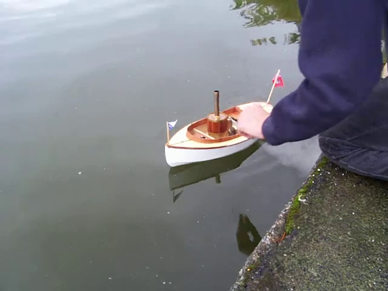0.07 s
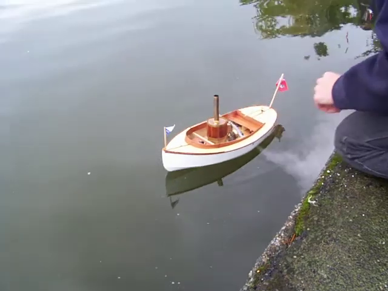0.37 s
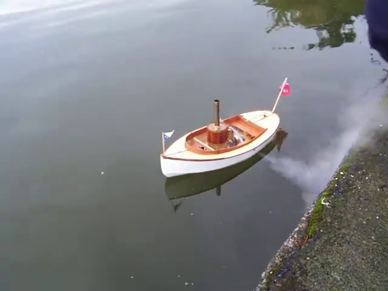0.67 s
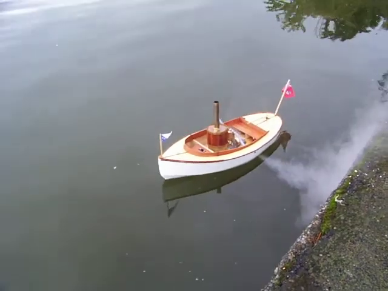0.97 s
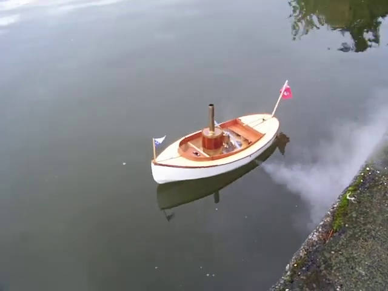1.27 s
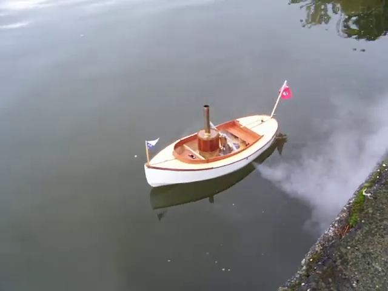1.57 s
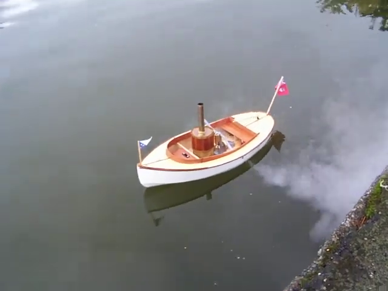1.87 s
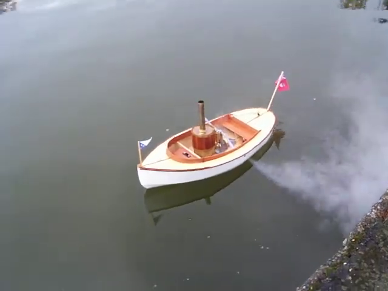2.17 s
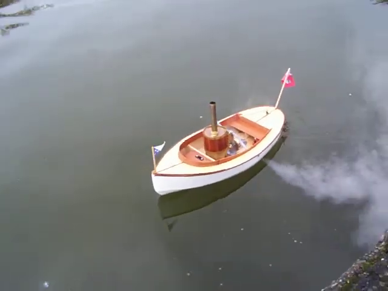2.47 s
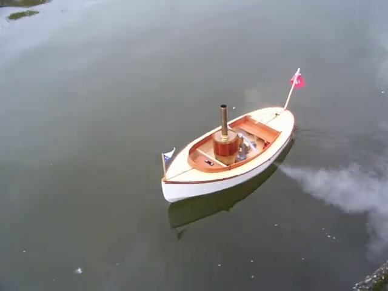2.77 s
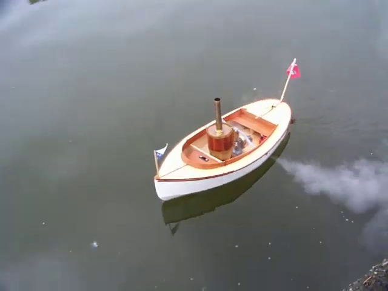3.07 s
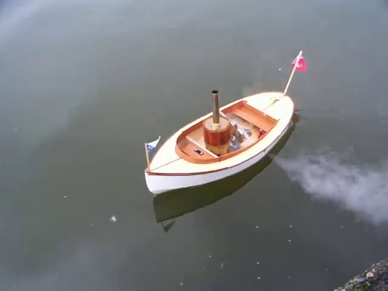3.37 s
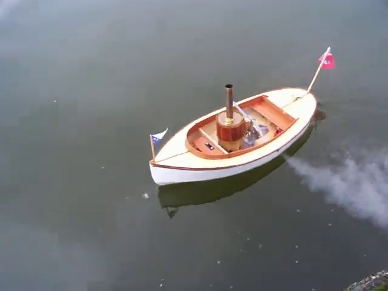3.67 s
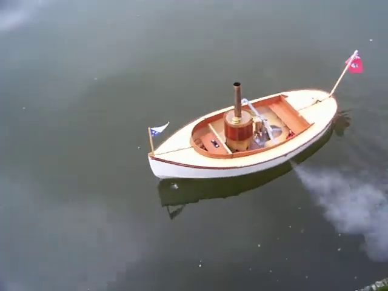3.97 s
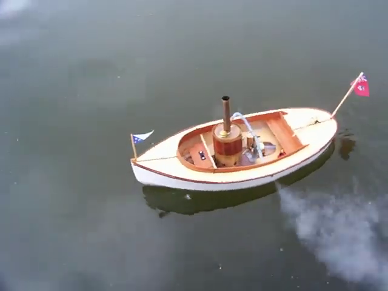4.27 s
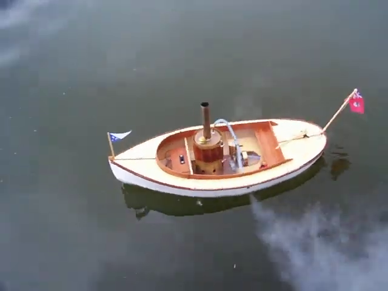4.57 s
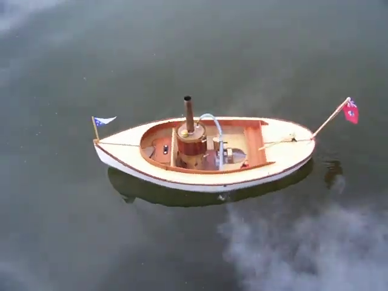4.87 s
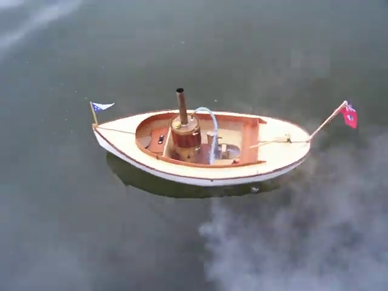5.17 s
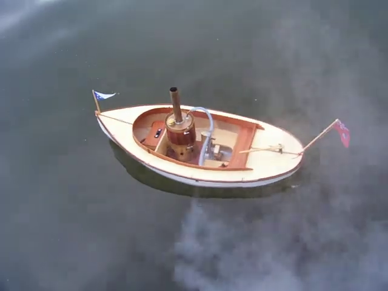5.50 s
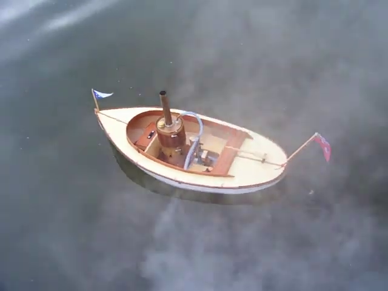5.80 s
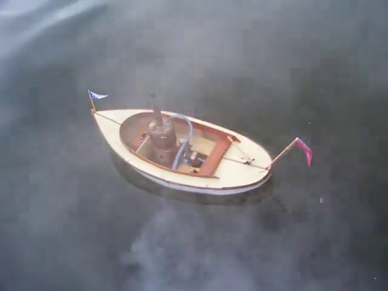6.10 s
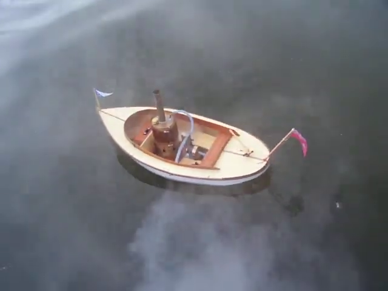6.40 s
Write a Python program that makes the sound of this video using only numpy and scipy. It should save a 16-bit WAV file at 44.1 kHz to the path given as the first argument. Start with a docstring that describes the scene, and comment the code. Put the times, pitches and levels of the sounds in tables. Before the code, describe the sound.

From about 0.2 seconds a small model steam launch is heard close by on a pond, its engine puffing about thirty-five times a second. Each puff is sharp and wet, with a high hiss, a faint gurgle and a knock that rings the hollow wooden hull; thinner leaking steam sputters between the puffs. From 0.5 to 1.5 seconds several soft, hollow bumps sound from the deck, with one more at 5 seconds. Tiny shrill spits of water come irregularly, thickest around 1.5 and from 3.5 to 4 seconds. After 2 seconds the engine gradually slows and the knocking softens as the boat draws away. Around 5 seconds the hiss swells, and a hollow note in the exhaust slides downward until the end at 6.5 seconds. There is one brief click near 5.4 seconds. Light wind rumbles on the microphone throughout.

```python
"""At the stone bank of a pond, close to a small camera's microphone, a model steam launch pulls away.
Its one-cylinder engine turns about 30 times a second. Each turn gives a sharp, wet exhaust puff, a knock
that rings the wooden hull and the cockpit, and a softer hiss of steam leaking at the port. Slugs of
water chirp in the pipe, and the jet changes colour as the boat swings from stern-on towards broadside.
Light wind rumbles on the microphone."""
import sys
import numpy as np
from scipy import signal
from scipy.fft import rfft, irfft
from scipy.io import wavfile
from scipy.ndimage import uniform_filter1d

SR = 44100
rng = np.random.default_rng(int(sys.argv[2]) if len(sys.argv) > 2 else 0)


def generate_wav(signal):
    """Clip the signal to [-1, 1] and save it as 16-bit WAV at the path in sys.argv[1]."""
    frames = np.transpose(np.atleast_2d(signal))
    scaled = np.clip(frames, -1, 1) * 32767
    pcm = np.round(scaled).astype(np.int16)
    wavfile.write(sys.argv[1], SR, pcm)


N = 288414
TIME = np.arange(N) / SR


# The engine, slowing on its way out. Each row: time in seconds, turns a second.
ENGINE_SPEED = [(0.23, 33.18), (0.53, 35.08), (0.73, 34.28), (1.15, 35.74), (1.43, 35.25), (2.05, 34.8),
                (2.32, 34.01), (2.45, 32.49), (2.76, 32.64), (3.42, 30.51), (3.78, 30.83), (3.91, 29.93),
                (4.04, 30.45), (4.17, 29.78), (4.82, 29.3), (4.95, 29.57), (5.63, 29.42), (6.54, 27.91)]
# The sound skips twice, as if a moment dropped out.
# Each row: time in seconds, jump of the rhythm as part of a turn.
SKIPS = [(2.934, .53), (5.4235, .42)]

def crank():
    """Turns of the crankshaft as heard: slightly uneven in speed, and jumping where the sound skips."""
    first_turn = .49
    jumps = sum(part * (TIME > s) for s, part in SKIPS)
    wobble = .002 * np.interp(TIME, np.linspace(0, TIME[-1], 100), rng.standard_normal(100))
    return first_turn + np.cumsum(curve(ENGINE_SPEED)) / SR - jumps + wobble


# Strokes that stand out. Each row: time in seconds, level in dB against their neighbours.
ODD_STROKES = [(.26, -4), (.33, -0.5), (.9, 1), (.98, -1.5), (1.32, 2.5), (1.435, 2), (1.52, -2.5),
               (2.06, -4), (2.12, -3), (2.21, 3), (2.24, -3.5), (2.27, 1.5), (2.33, -4.5), (2.42, 3),
               (2.505, -2.5), (2.63, 2), (2.75, 2), (2.88, 1), (3.63, 0), (3.83, 7.5), (4.36, -1),
               (4.49, -7), (5.73, 3), (5.765, -2), (5.9, 5.5), (6.18, 0), (6.46, 2)]

def accents(turns):
    """Gain of the hard and the starved strokes, held for their turn."""
    stroke = np.floor(turns)
    return gain_of(sum(db * (stroke == np.round(np.interp(s, TIME, turns))) for s, db in ODD_STROKES))


# Steam at the pipe and at the port. Each row: part of a turn since the exhaust opened, relative flow in dB.
PUFF_FLOW = [(0, -11), (.045, -4.5), (.09, -1), (.17, -7), (.25, -13), (.36, -24), (.6, -45), (1, -32)]
LEAK_FLOW = [(0, -10.5), (.2, -15.5), (.38, -16.5), (.45, -12), (.51, 2.5), (.6, 5), (.74, 1.5), (.85, -5),
             (1, -5.5)]

def steam(turns):
    """Flow of the exhaust puffs, some clipped and some drawn out, and of the leak between them."""
    angle = turns % 1
    puff_db = np.interp(angle * per_turn(turns, spread_db=.9), *np.transpose(PUFF_FLOW))
    puff = gain_of(puff_db) * accents(turns) * per_turn(turns, spread_db=.96)
    leak = gain_of(np.interp(angle, *np.transpose(LEAK_FLOW))) * per_turn(turns, spread_db=1.17)
    return puff, leak


# The exhaust jet at the microphone. Each row: time in seconds, hiss in dB, roar in dB.
JET_LEVEL = [(.23, -31.5, -34.5), (1.05, -31, -36.5), (1.45, -30, -34), (1.8, -28, -34.5),
             (1.93, -29.5, -36.5), (3.26, -33.5, -36.5), (3.39, -32, -40), (3.55, -30.5, -37.5),
             (3.91, -35.5, -43), (4.04, -30, -35.5), (4.17, -34, -45), (4.3, -33, -36.5),
             (4.66, -33.5, -41.5), (4.88, -28.5, -37), (5.25, -27, -37.5), (5.73, -33, -38),
             (6.54, -33.5, -36.5)]
# The hiss from astern and from broadside. Each row: frequency in Hz, relative level in dB.
HISS_ASTERN = [(2530, -65.5), (4300, -48), (4900, -14.5), (5590, -1), (6450, -4), (7140, 4), (7480, 7.5),
               (8150, 3), (8490, -9), (9000, -30.5), (11700, -60.5), (19800, -120)]
HISS_BROADSIDE = [(2530, -47), (4300, -21), (4630, -14), (5700, -21.5), (6190, -3.5), (6630, -1.5),
                  (7230, 4), (7930, -3.5), (8590, -14), (9000, -29), (11700, -24.5), (19800, -120)]

def hiss(puff):
    """Fine turbulence at the exhaust pipe, wet with condensate."""
    jet = puff * condensate(per_s=400, size=.8, rise_s=.00045) * rng.standard_normal(N)
    return gain_of(curve(JET_LEVEL)) * turning(jet, HISS_ASTERN, HISS_BROADSIDE)


# The roar from astern and from broadside. Each row: frequency in Hz, relative level in dB.
ROAR_ASTERN = [(200, -18.5), (740, -4.5), (1100, 3), (1220, -15), (1350, -1), (1570, -0.5), (1820, -4.5),
               (1980, -14.5), (2260, -3), (2750, -13), (3080, -1.5), (3550, -14.5), (3900, -12.5),
               (5000, -18)]
ROAR_BROADSIDE = [(200, -10), (700, -12), (1100, -8.5), (1250, -16), (1450, -8), (2200, -7), (2450, -6),
                  (2650, -1.5), (3150, -10), (3700, -10.5), (5000, -17.5)]
# The open boat's note, heard side-on. Each row: time in seconds, pitch in Hz, dB against the roar.
HOLLOW_NOTE = [(4.5, 2210, -28), (5.1, 2070, -9), (5.4, 1850, -0.5), (5.8, 1760, -1), (6.15, 1630, -1.5),
               (6.5, 1550, -4)]

def roar(puff, knocks):
    """Coarse eddies linger over the burner's rush and the engine's rattle; puffs pop a hollow note."""
    burner = gain_of(-18)
    eddies = lingering(puff ** 2 + burner ** 2, linger_s=.0035)
    flow = evened(uniform_filter1d(eddies, size=250))
    rattle_share = .3 * (1 - curve(STEAM_SHARE))
    rush = np.sqrt(1 - rattle_share) * flow * rng.standard_normal(N)
    jet = turning(rush + np.sqrt(rattle_share) * rattle(knocks), ROAR_ASTERN, ROAR_BROADSIDE)
    pop = evened(puff * rng.standard_normal(N)) + .99 * knocks
    note = evened(ring(pop, curve(HOLLOW_NOTE), width_hz=400))
    note_gain = gain_of(curve(HOLLOW_NOTE, column=2))
    blend = (jet + note_gain * note) / np.sqrt(1 + note_gain ** 2)
    return gain_of(curve(JET_LEVEL, column=2) - .05) * blend


# Water shot from the exhaust. Each row: time in seconds, relative peak level in dB.
SPITS = [(0.609, -19), (0.639, -20), (.8992, -6), (1.348, -7), (1.378, -8), (1.4641, -7), (1.548, -7.5),
         (1.605, -5), (1.7459, -8.5), (2.09, -11), (2.1216, -3), (2.951, -9), (3.269, -7), (3.5313, -3),
         (3.565, -4), (3.597, -6), (3.63, -5.5), (3.6934, -3.5), (3.7948, -9), (3.726, -8.5), (3.858, -10),
         (3.99, -8), (4.056, -9.5), (4.934, -5), (5.103, -5), (5.1702, -12), (5.3417, -11.5),
         (5.4097, -4.5), (5.4548, -6), (5.5945, -5), (5.6595, -7), (6.356, -9), (6.4625, -20)]

def spits(decay_s=.0007, level_db=-4, glide=.02):
    """Each slug of water leaves the pipe with a shrill chirp of a few cycles."""
    out, t = np.zeros(N), np.arange(-200, 200) / SR
    for s, db in SPITS:
        hz = 7820 - 750 * np.interp(s, *np.transpose(HEADING))  # lower as the pipe turns
        bend, phase = rng.uniform(-1, 1, 2)
        cycles = hz * t * (1 + glide * bend * t / decay_s) + phase
        envelope = gain_of(db + level_db) * np.exp(-abs(t / decay_s))
        at = round(s * SR) - len(t) // 2
        out[at:at + len(t)] += envelope * np.sin(2 * np.pi * cycles)
    return out


# The leak at the microphone. Each row: time in seconds, level in dB.
LEAK_LEVEL = [(.3, -38), (.5, -33.5), (.75, -34), (1.05, -33.5), (1.35, -32.5), (1.62, -32.5), (1.9, -36),
              (2.15, -34), (2.7, -36.5), (3.4, -39), (3.55, -36), (3.75, -40.5), (4.1, -38.5), (4.7, -39),
              (4.9, -32.5), (5.3, -35.5), (5.95, -36), (6.2, -37.5), (6.5, -35.5)]
# Its hiss, thinner and higher than the puff. Each row: frequency in Hz, relative level in dB.
LEAK_COLOUR = [(500, -29.5), (1000, -11.5), (1600, -12), (2100, -15), (2900, -12), (4300, -27), (5500, -16),
               (6400, -10), (7000, -3), (7600, 1), (8200, -7.5), (9000, -32)]

def port_leak(leak):
    """Steam sputters out of the port between the puffs."""
    jet = leak * condensate(per_s=250, size=1.5, rise_s=.0006) * rng.standard_normal(N)
    return gain_of(curve(LEAK_LEVEL)) * coloured(jet, LEAK_COLOUR)


def condensate(per_s, size, rise_s):
    """Drops tear in the jet: a gain that adds brief surges to the flow."""
    drops = (rng.random(N) < per_s / SR) * rng.random(N)
    age = TIME[:512] / rise_s
    return 1 + size * signal.oaconvolve(drops, age * np.exp(1 - age))[:N]


def gurgle(turns, puff):
    """Each puff bubbles through water in the pipe and rings at a pitch of its own."""
    hz = 1480 * per_turn(turns, spread_db=1.5)
    bubbling = lingering(puff ** 2, linger_s=.0028) * rng.standard_normal(N)
    return gain_of(curve(JET_LEVEL, column=2) - 9) * evened(ring(bubbling, hz, width_hz=440))


# The boat seen from the bank. Each row: time in seconds, heading from 0 (stern-on) to 1 (broadside).
HEADING = [(.2, 0.024), (3.2, 0.26), (4.3, 0.65), (5.1, 0.93), (5.6, 0.78), (6.5, 0.65)]

def turning(x, astern, broadside):
    """The colour of the jet follows the heading of the boat."""
    side = curve(HEADING)
    return evened((1 - side) * coloured(x, astern) + side * coloured(x, broadside))


def piston(turns, lag_turns):
    """One blow of the piston in every turn."""
    blows = np.diff(np.floor(turns - lag_turns), prepend=0).clip(0, 1)
    return evened(blows * accents(turns) * per_turn(turns, spread_db=1.16))


def rattle(knocks, fade_s=.0015):
    """The many small modes of engine and boiler answer every knock alike, swelling before they fade."""
    age = TIME[:1500] / fade_s
    response = rng.standard_normal(len(age)) * age * np.exp(-age)
    return evened(signal.oaconvolve(knocks, response)[:N])


# Steam noise in what rings the hull, growing with distance. Each row: time in seconds, share of 1.
STEAM_SHARE = [(2.1, .08), (3, .25), (3.8, .45), (6.5, .55)]
# Modes of the deck, then the low ones of hull and boiler.
# Each row: frequency in Hz, resonator width in Hz, relative level in dB.
DECK_MODES = [(539.3, 89, -3.5), (590, 92, 0), (645.2, 33.5, -4.5)]
THUMP_MODES = [(242.5, 33, 4), (324, 110, 0), (407, 35, 3)]

def hull(turns, puff):
    """Knocks and buffeting steam ring the hull, the bank throws them back, and ripples slap the deck."""
    knocks = piston(turns, lag_turns=.08)  # the heavy hull answers a little late
    buffet = evened((lingering(puff ** 2, linger_s=.007) + .1) * rng.standard_normal(N))
    share = curve(STEAM_SHARE)
    drive = bank_echo(np.sqrt(1 - share) * knocks + np.sqrt(share) * buffet, delay_s=.00486)
    ripples = gain_of(-4.5) * rng.standard_normal(N)
    deck = sum(gain_of(db) * ring(drive + ripples, hz, width) for hz, width, db in DECK_MODES)
    thump = sum(gain_of(db) * resonate(drive + .29 * knocks, hz, width) for hz, width, db in THUMP_MODES)
    return hull_gain(-42.5) * evened(deck) + hull_gain(-47.5, broadside_db=-6) * evened(thump)


def hull_gain(level_db, broadside_db=0):
    """The hull sounds louder with a stronger jet; turning broadside can shade or lift it."""
    jet_db = (curve(JET_LEVEL) + curve(JET_LEVEL, column=2)) / 2
    return gain_of(level_db + .95 * (jet_db - jet_db.mean()) + broadside_db * curve(HEADING))


# The cockpit's note as the boat draws off. Each row: time in seconds, pitch in Hz, level in dB.
COCKPIT_NOTE = [(.3, 853, -39.5), (1.1, 833, -41.5), (1.7, 858, -38), (2.5, 905, -42.5), (3.1, 957, -46.5),
                (3.5, 993, -48), (4.3, 987, -46), (5.1, 1015, -44), (5.6, 1035, -56), (6.5, 895, -44.5)]
# It answers later while the bank is near. Each row: time in seconds, lag as part of a turn.
COCKPIT_LAG = [(2.5, 0.1785), (3.6, .09), (6.5, .07)]

def cockpit(turns, puff):
    """The air in the cockpit rings on after every puff with a pitched note, drawn out by the bank."""
    eddies = evened(lingering(puff ** 2, linger_s=.0052) * rng.standard_normal(N))
    blow = piston(turns, curve(COCKPIT_LAG)) + 1.5 * curve(STEAM_SHARE) * eddies
    hz = curve(COCKPIT_NOTE) * per_turn(turns, spread_db=.12)
    note = ring(bank_echo(blow, delay_s=.00354), hz, width_hz=185)
    return gain_of(curve(COCKPIT_NOTE, column=2)) * evened(note)


# Hollow booms, most of them close to the bank. Each row: start in seconds, peak level in dB.
DECK_BOOMS = [(.526, -25), (.808, -28), (1.158, -25), (1.233, -30), (1.27, -22), (1.354, -31), (1.439, -26),
              (1.497, -25), (5.006, -27.5)]

def deck_booms(hz=599, rise_s=.0032):
    """Now and then the deck is jolted and rings out at its main note."""
    out, t = np.zeros(N), TIME[:3000]
    age = t / rise_s
    boom = age * np.exp(1 - age) * np.sin(2 * np.pi * hz * t)
    for s, db in DECK_BOOMS:
        at = round(s * SR)
        out[at:at + len(t)] += gain_of(db) * boom
    return out


# The low hum of the whole boat. Each row: multiple of the engine speed, relative level in dB.
SHAKE_HARMONICS = [(1, -68), (2, -54), (3, -61.5)]

def shake(turns):
    """The unbalanced piston rocks the boat at the first multiples of its speed."""
    return sum(np.sqrt(2) * hull_gain(db, broadside_db=5) * np.sin(2 * np.pi * k * turns)
               for k, db in SHAKE_HARMONICS)


# The bank's echo, fading with distance. Each row: time in seconds, share thrown back.
BANK_RETURN = [(2, 0.53), (3, 0.37), (4.2, 0.21)]

def bank_echo(x, delay_s):
    """A sound and its first two echoes between hull and stone bank."""
    back = curve(BANK_RETURN)
    return sum(back ** k * np.interp(TIME - k * delay_s, TIME, x) for k in range(3)) / (1 + back)


# Very bright ticks, mostly faint. Each row: time in seconds, level in dB before the last treble cut.
TICKS = [(1.55, -54), (1.8024, -53), (1.9157, -53), (2.2329, -38), (2.9548, -49), (3.5654, -45),
         (3.6921, -45), (5.1723, -46), (5.2596, -42), (5.4077, -43), (5.4243, -18), (5.5963, -45)]

def ticks():
    """Single sharp ticks; the loudest is the click where the sound skips the second time."""
    out = np.zeros(N)
    for s, db in TICKS:
        out[round(s * SR)] = gain_of(db)
    return out


# The breeze right on the microphone. Each row: time in seconds, level in dB before gusts.
WIND_LEVEL = [(.3, -41.5), (2, -43.5), (3.5, -49), (4.6, -46), (5.1, -41.5), (5.5, -45), (6.5, -43.5)]
# Its rumble. Each row: frequency in Hz, relative level in dB.
WIND_COLOUR = [(8, -14.5), (21, 3.5), (32, -7), (44, -4), (62, -14), (100, -14.5), (160, -17), (400, -25.5),
               (1500, -25.5)]

def wind(gust_db=3, gusts_per_s=7.5):
    """Air rumbles over the microphone in lumpy gusts."""
    gusts = np.interp(TIME * gusts_per_s, np.arange(128), rng.standard_normal(128))
    return gain_of(curve(WIND_LEVEL) - gust_db * gusts) * coloured(rng.standard_normal(N), WIND_COLOUR)


def gain_of(db):
    """Decibels to amplitude."""
    return 10 ** (np.asarray(db) / 20)


def evened(x):
    """Scales to rms 1."""
    return x / np.sqrt(np.mean(x ** 2) + 1e-20)


def curve(rows, column=1):
    """One column of a table at every sample."""
    rows = np.asarray(rows)
    return np.interp(TIME, rows[:, 0], rows[:, column])


def per_turn(turns, spread_db):
    """A random factor near 1, held for each turn."""
    luck = np.sqrt(3) * rng.uniform(-1, 1, size=256)
    return gain_of(spread_db * luck)[turns.astype(int)]


def lingering(power, linger_s):
    """Amplitude of a flow whose eddies take a while to die."""
    keep = np.exp(-1 / (linger_s * SR))
    return np.sqrt(signal.lfilter([1 - keep], [1, -keep], power))


def coloured(x, spectrum):
    """Filters by a short spectrum whose ends fall away steeply; rms 1."""
    hz, db = np.transpose(spectrum)
    log_f = np.log(np.fft.rfftfreq(N, 1 / SR) + 1)
    outside = np.maximum(np.log(hz[0]) - log_f, 0) + np.maximum(log_f - np.log(hz[-1]), 0)
    response = gain_of(np.interp(log_f, np.log(hz), db) - 60 * outside)
    return evened(irfft(rfft(x) * response, N))


def resonate(x, hz, width_hz):
    """A resonance of gain 1 whose pitch may follow a curve."""
    carrier = np.exp(2j * np.pi * np.cumsum(hz * np.ones(N)) / SR)
    keep = np.exp(-np.pi * width_hz / SR)
    return 2 * (carrier * signal.lfilter([1 - keep], [1, -keep], x / carrier + 1e-18)).real


def ring(x, hz, width_hz):
    """The same resonance twice over: a note that swells before it fades."""
    return resonate(resonate(x, hz, width_hz), hz, width_hz)


def low_pass(x, edge_hz):
    """A steep, even cut of the treble."""
    taps = signal.firwin(255, edge_hz, window=("kaiser", 8), fs=SR)
    return signal.oaconvolve(x, taps[None], "same")


def scene():
    """The launch heard from the bank, in mono: one crankshaft times steam and hull alike."""
    turns = crank()
    knocks = piston(turns, lag_turns=.0093)
    puff, leak = steam(turns)
    exhaust = hiss(puff) + port_leak(leak) + spits() + roar(puff, knocks)
    boat = hull(turns, puff) + deck_booms() + shake(turns)
    return (exhaust + gurgle(turns, puff) + boat + cockpit(turns, puff) + wind())[None]


def record(dry):
    """The camera's microphone opens late, with a treble notch and a narrow band; only ticks top it."""
    opens_s, notch_hz = .2325, 4230
    notched = signal.lfilter(*signal.iirnotch(notch_hz, Q=4.5, fs=SR), dry * (TIME > opens_s))
    narrow = low_pass(notched, edge_hz=9000)
    return low_pass(narrow + ticks(), edge_hz=15800)


dry = scene()
out = record(dry)
generate_wav(out)
```